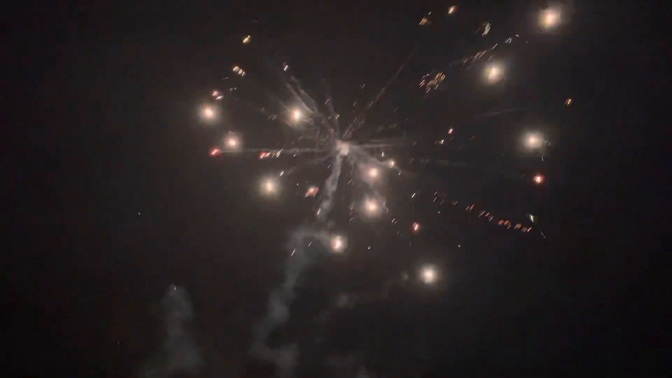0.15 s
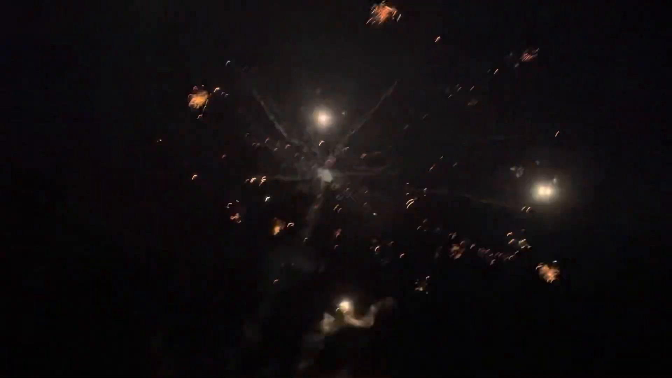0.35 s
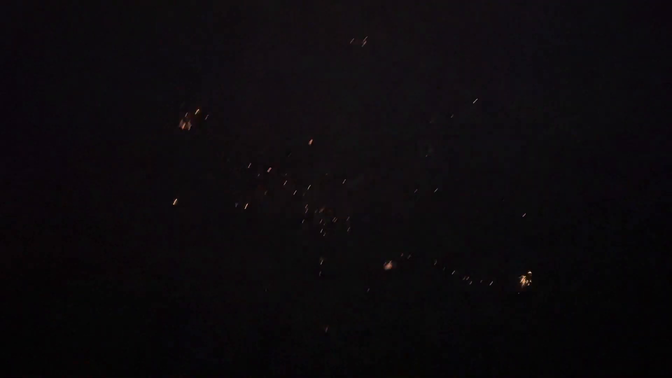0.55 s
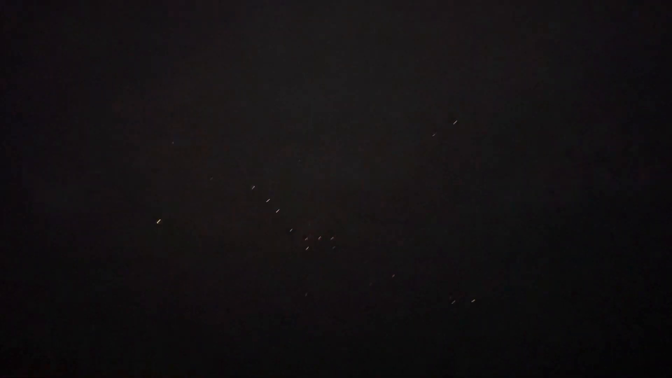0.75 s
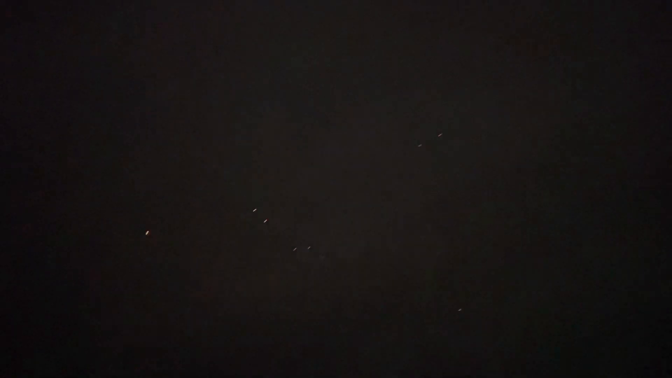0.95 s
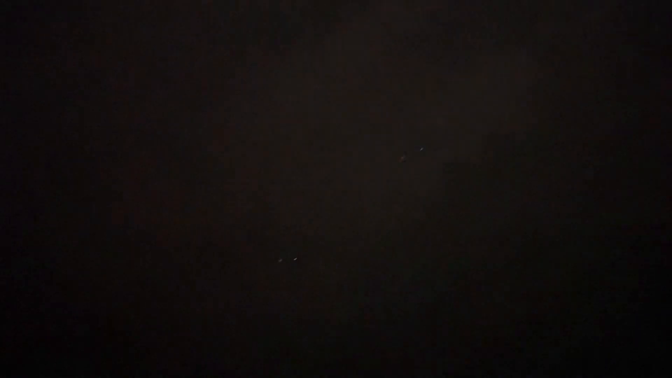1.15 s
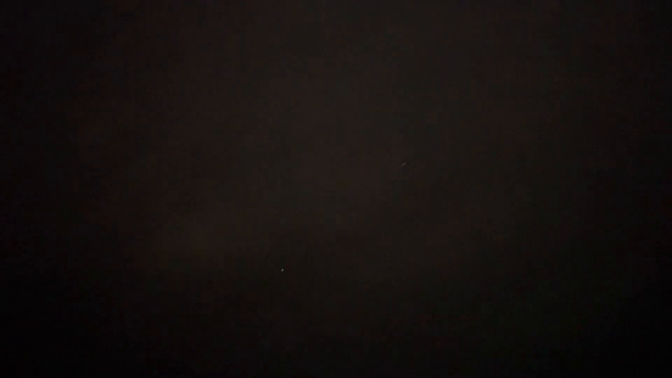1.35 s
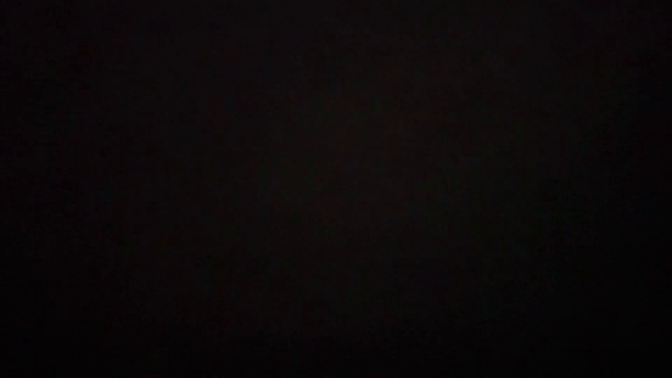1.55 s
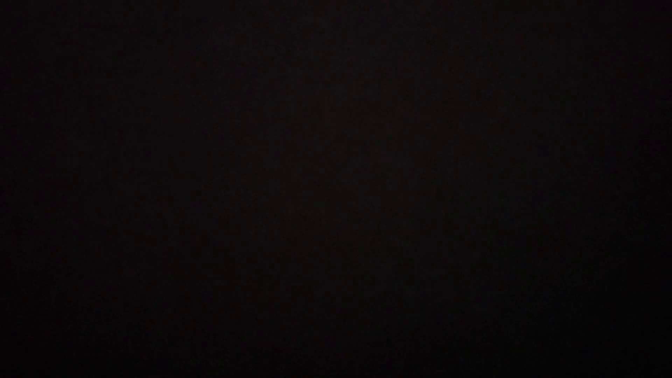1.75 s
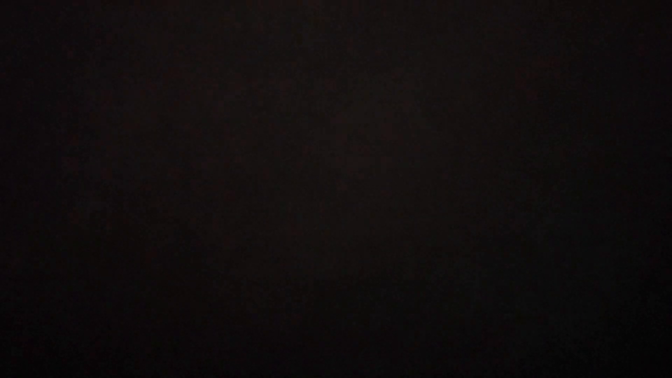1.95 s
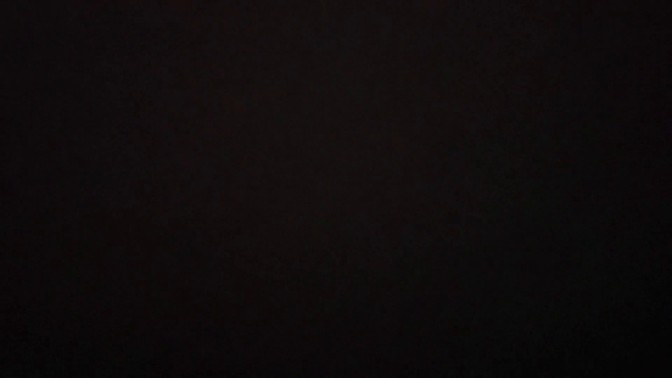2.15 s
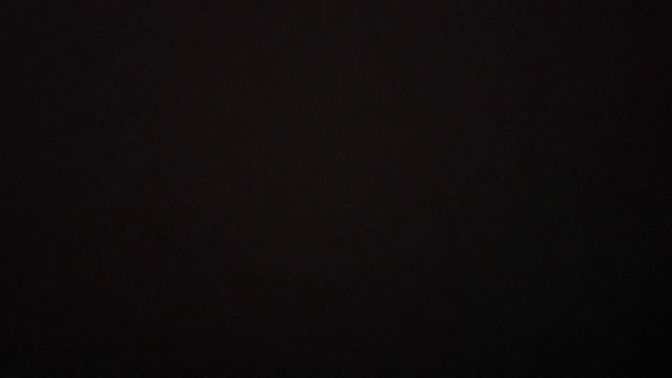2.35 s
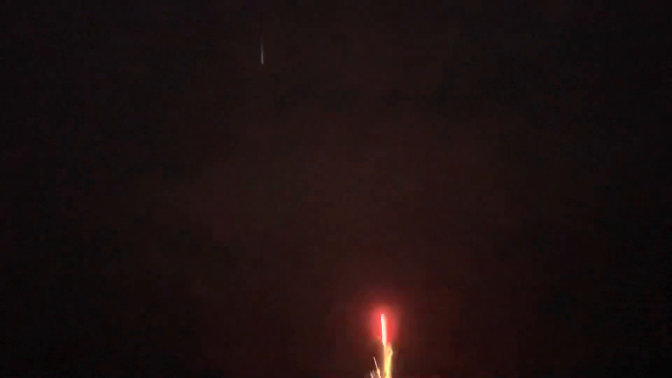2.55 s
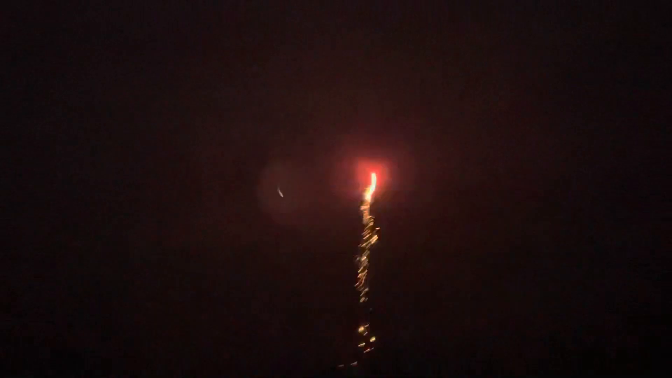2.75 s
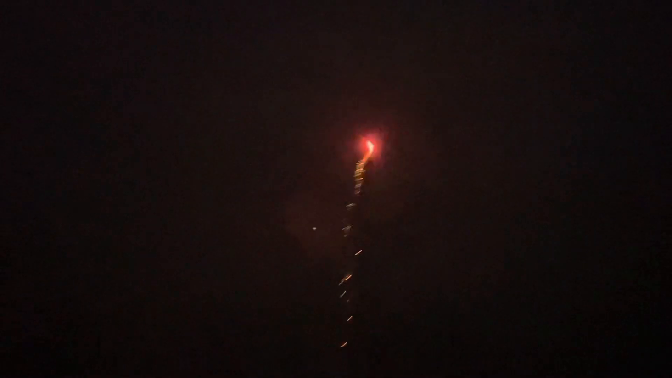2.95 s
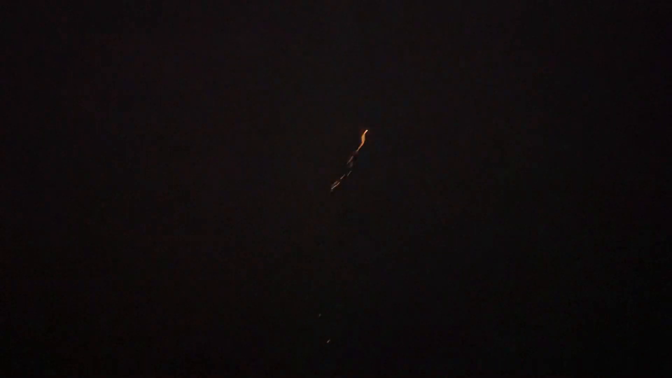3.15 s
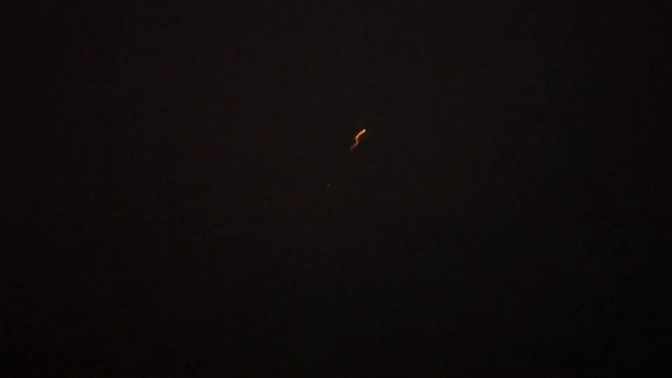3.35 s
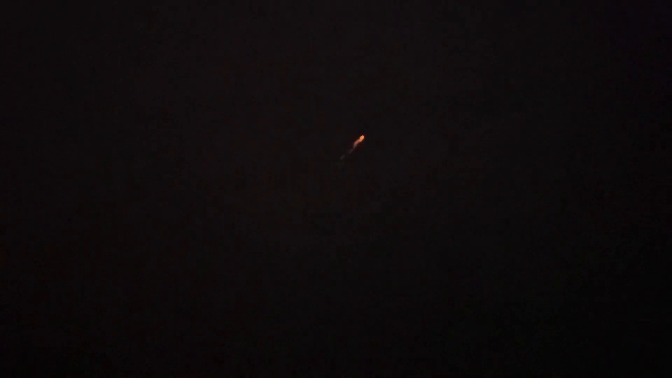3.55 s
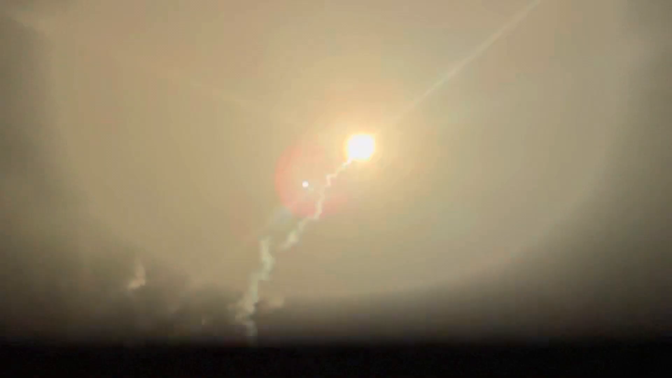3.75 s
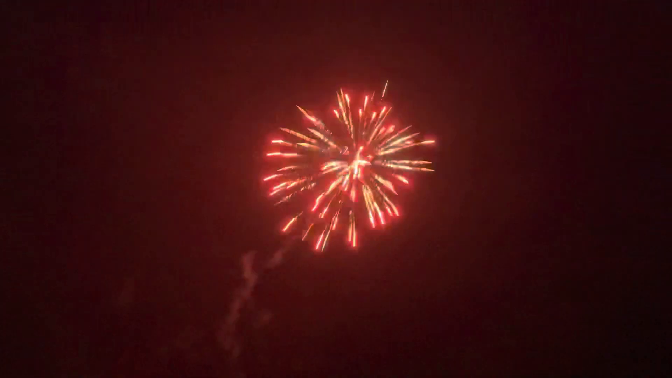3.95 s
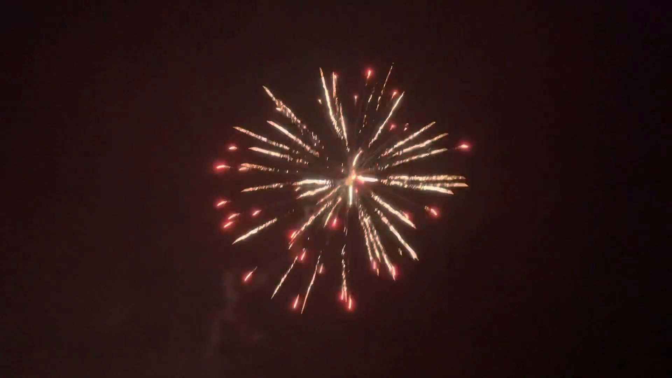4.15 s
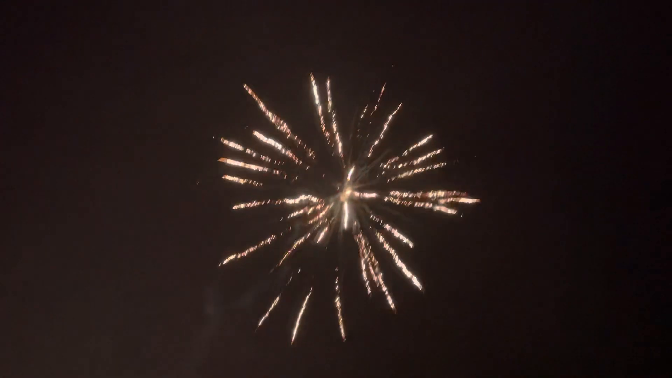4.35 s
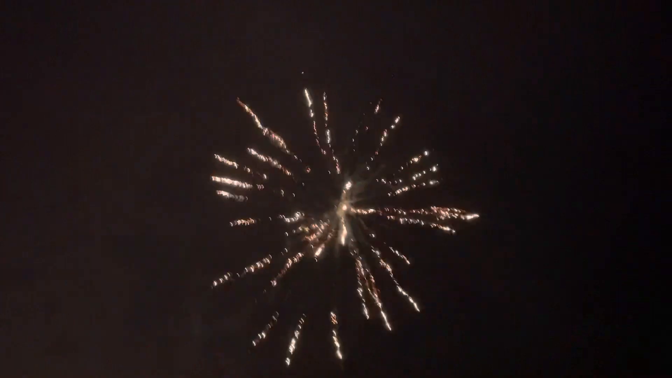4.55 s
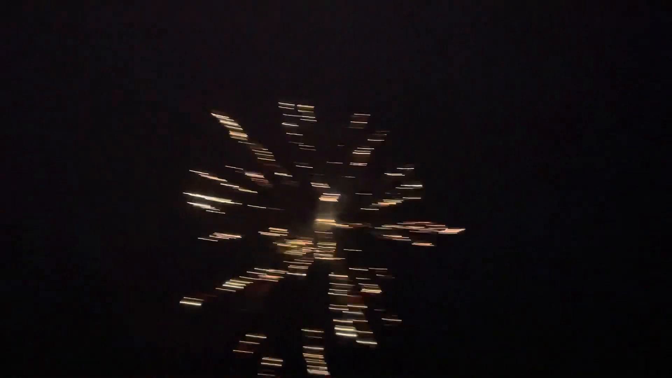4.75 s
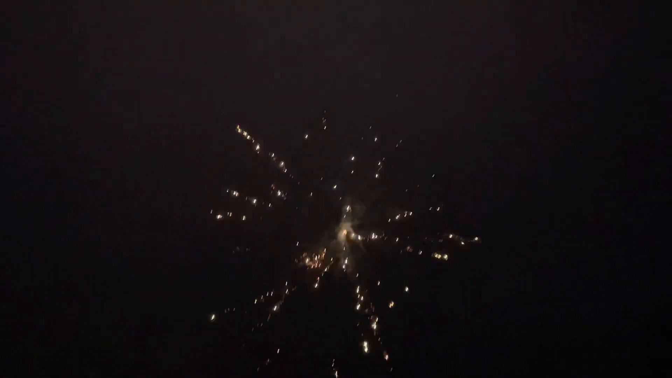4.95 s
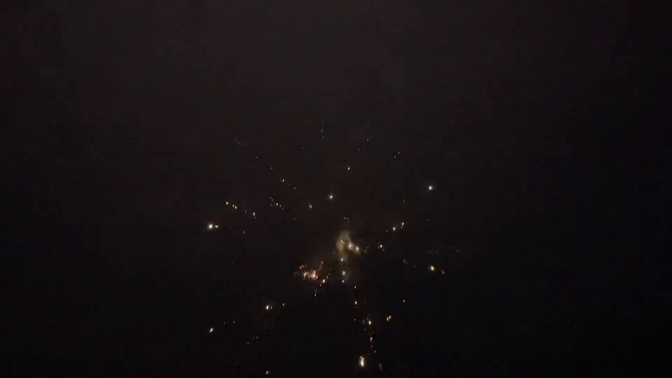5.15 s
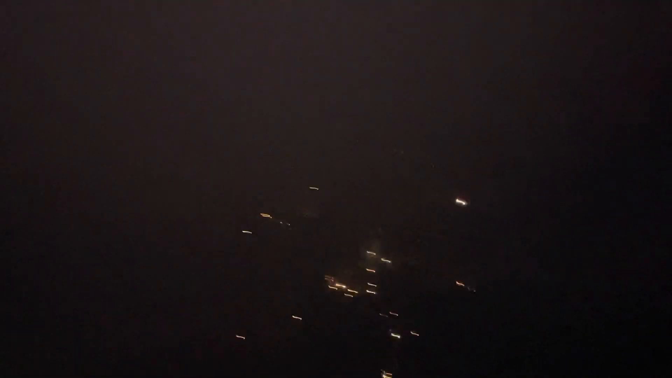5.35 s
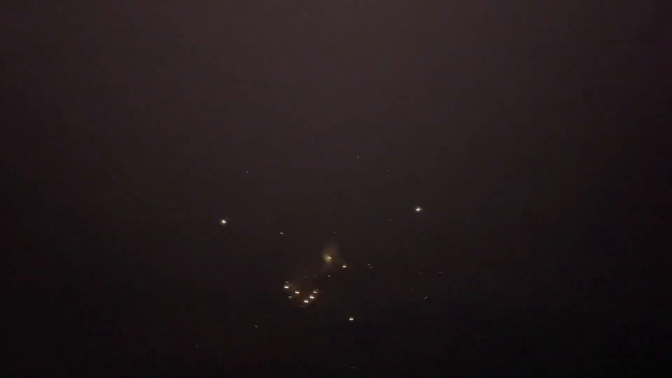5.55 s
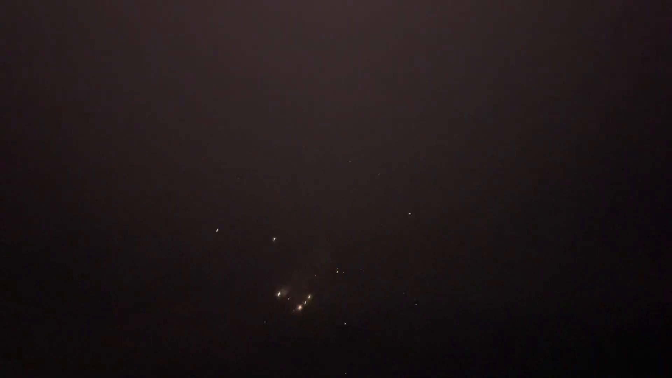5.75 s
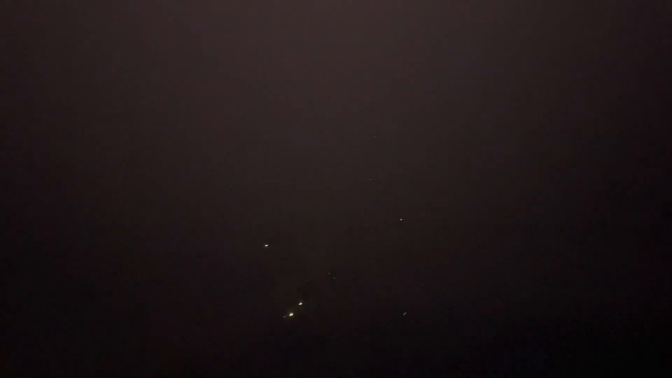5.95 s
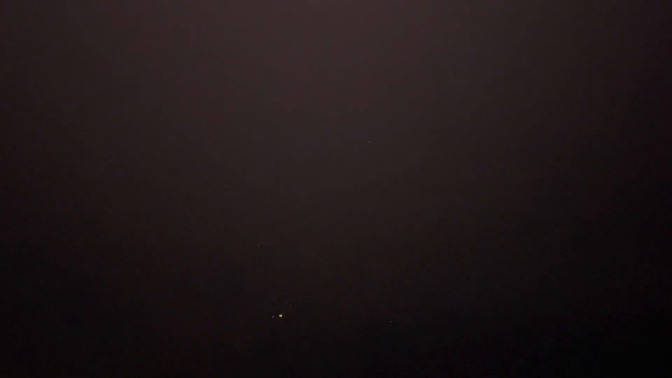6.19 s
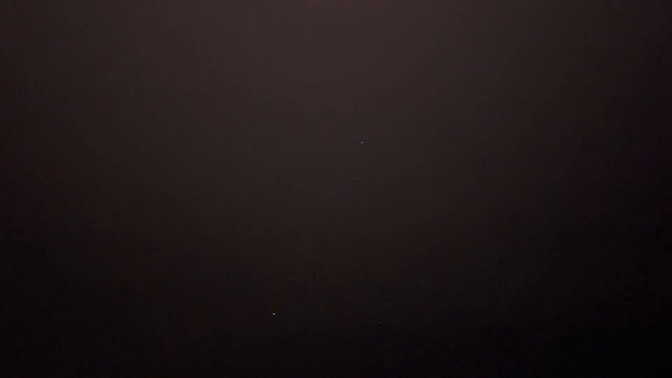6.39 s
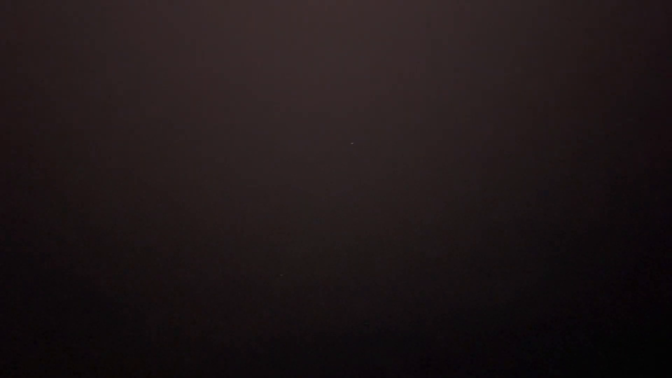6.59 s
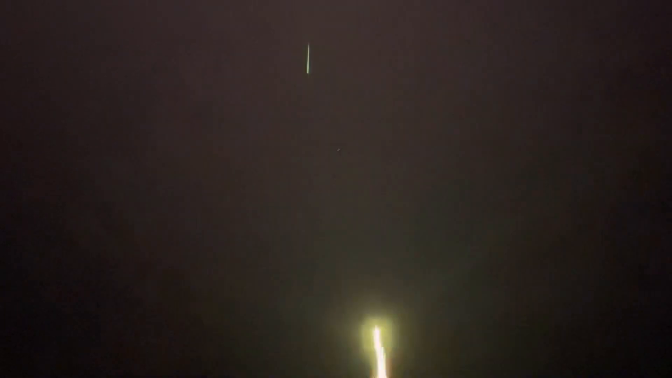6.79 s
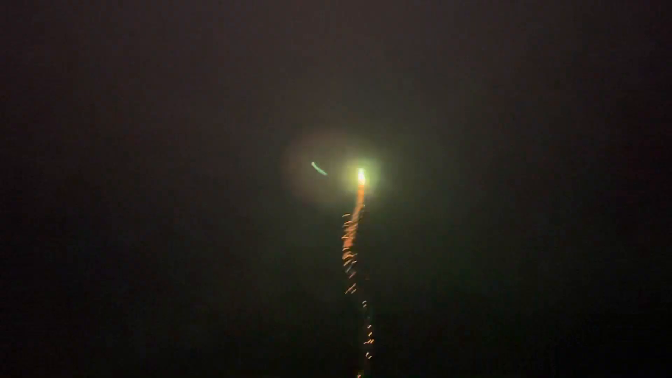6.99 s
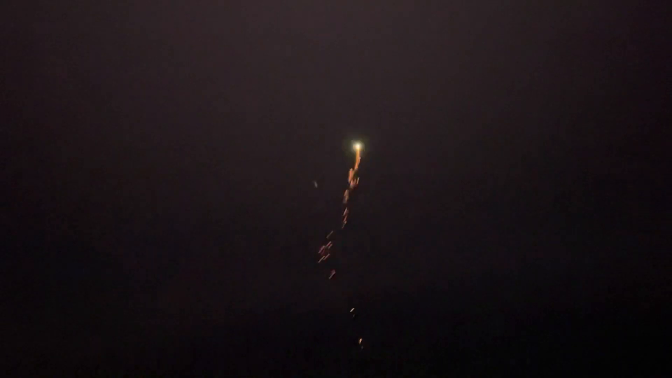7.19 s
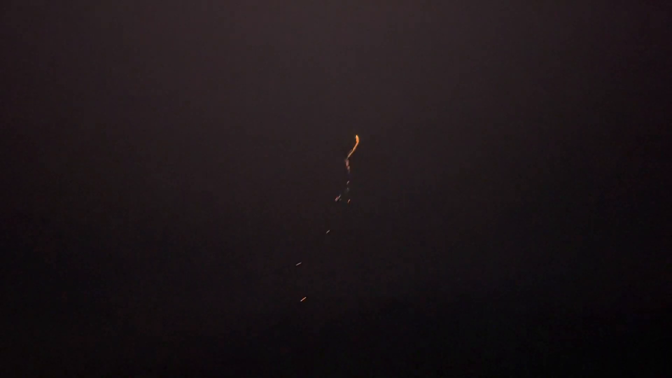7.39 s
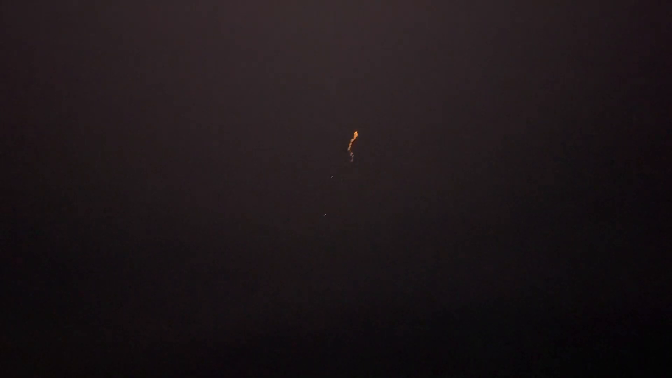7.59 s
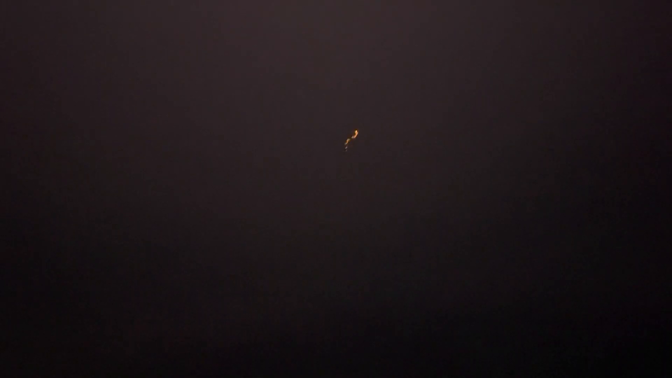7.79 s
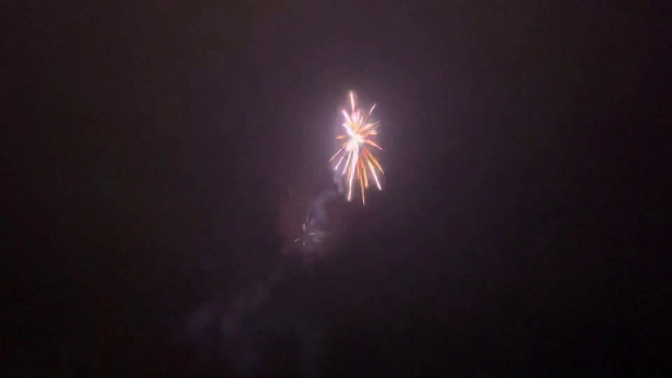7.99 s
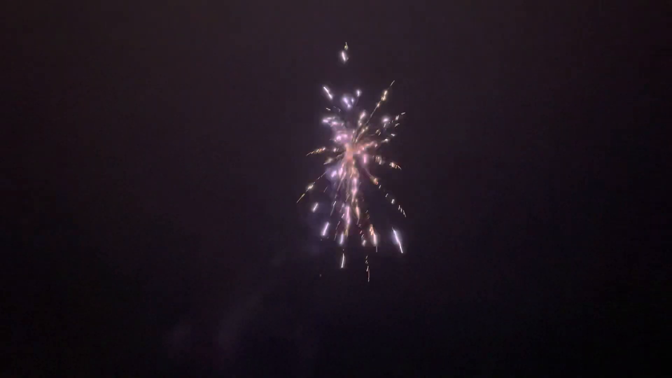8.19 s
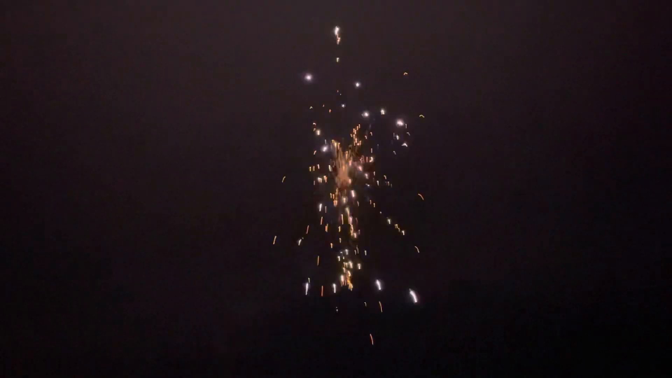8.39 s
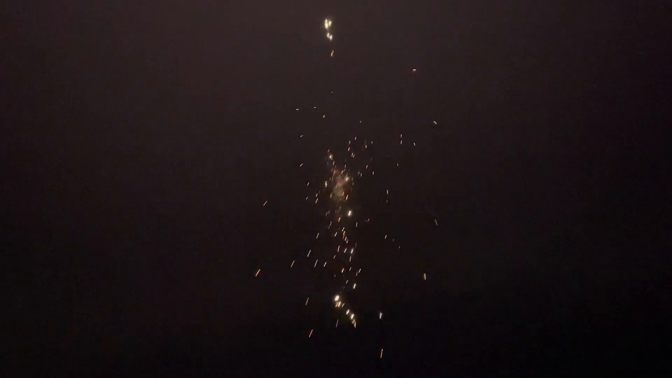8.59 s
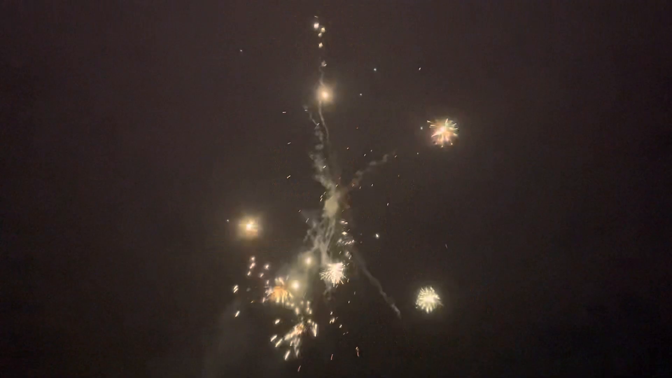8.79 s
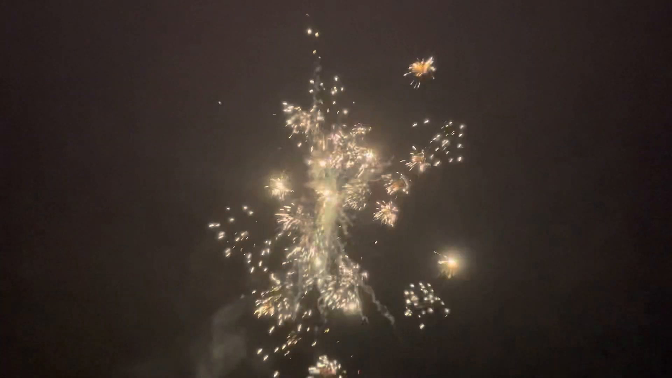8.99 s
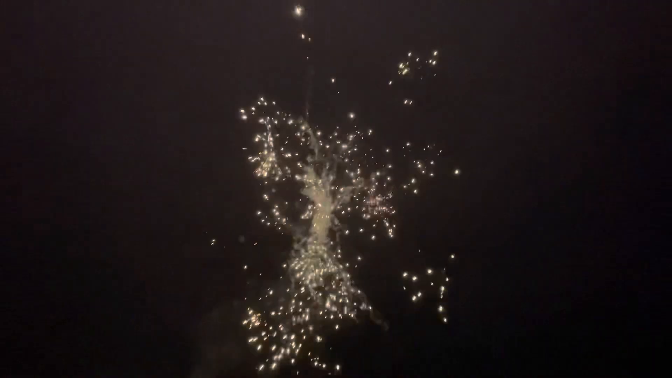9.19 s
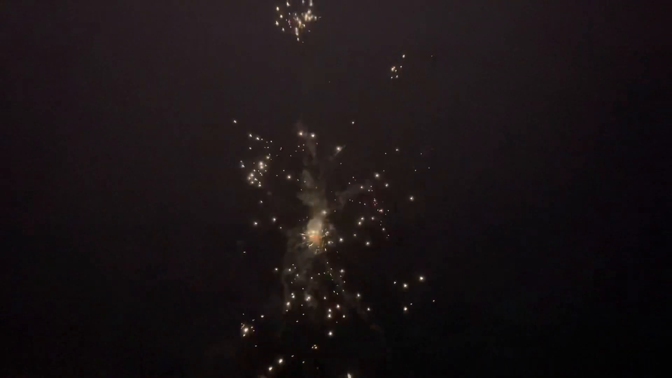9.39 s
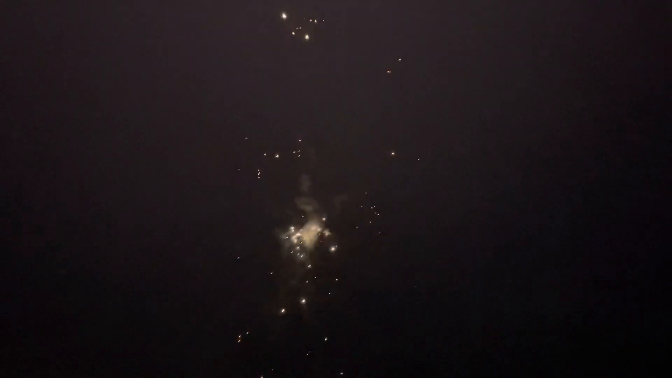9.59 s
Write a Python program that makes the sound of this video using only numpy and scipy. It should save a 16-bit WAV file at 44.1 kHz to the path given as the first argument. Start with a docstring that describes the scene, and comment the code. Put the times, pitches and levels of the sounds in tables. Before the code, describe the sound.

A quiet night outdoors, captured in stereo on a small recorder that softens the loudest peaks. At 0 s the roll of an earlier firework burst is still fading, while stars crackle in a dense spray from about 0.1 to 0.6 s. The roll dulls into a faint low rumble with barely audible ticks. At 2.4 s a launch tube thumps: a sudden, hard, bassy shock with a short hollow note, a quick wall slap and a fading roll. A very faint hiss precedes the sharp burst overhead at 3.9 s, with a duller ground echo and a long rumble losing treble. Near quiet returns by about 6 s. A second launch thuds at 6.7 s, a slight airy hiss rises around 7.5 s, and a deeper burst cracks at 8.05 s. Over its roll, a few pops at 8.7 s grow into thick crackling around 9 s, thinning by 9.5 s into a fading echo.

```python
"""A shell that has just burst is still rolling as its stars crackle; then two more shells go up in the night.
For each, a tube thumps (a muzzle shock in a short burst of noise, and a hollow note), a faint hiss climbs, and
a burst follows about 1.4 s later. Bangs come back from the ground or walls, then roll round the neighbourhood
as fading noise that grows duller. The last burst ends in crackles too: many tiny shocks and spits of gas.
A faint rumble and a few ticks fill the night. A small stereo recorder rounds off the peaks."""
import sys
import numpy as np
from scipy import signal
from scipy.fft import rfft, irfft, next_fast_len
from scipy.io import wavfile

SR = 44100
rng = np.random.default_rng(int(sys.argv[2]) if len(sys.argv) > 2 else 0)


def unload_audio(sound):
    """Save the sound as a 16-bit wav file, at the path given as the first command line argument."""
    columns = np.transpose(np.atleast_2d(sound))
    # keep every value between -1 and 1, then stretch to whole-number steps
    steps = np.round(np.clip(columns, -1, 1) * 32767)
    wavfile.write(sys.argv[1], SR, steps.astype(np.int16))


N = 424666
LEAD = SR // 2  # the scene starts half a second early, so that an earlier burst is still rolling
SIZE = N + LEAD
SHORT = 8192  # samples in the buffer of one bang
HALF_S = SHORT / 2 / SR  # a bang peaks at the middle of its buffer
SECOND = np.arange(SR) / SR  # the time in s along one second


def undb(db):
    """Turn decibels into a gain."""
    return 10 ** (np.asarray(db) / 20)


def along(points, hz):
    """Read a table of (pitch_hz, value) on a log-frequency axis."""
    f, value = np.transpose(points)
    return np.interp(np.log(np.maximum(hz, 1)), np.log(f), value)


def freqs(size):
    """Frequencies of a spectrum of this many samples."""
    return np.fft.rfftfreq(size, 1 / SR)


def unit(x):
    """Scale to a total energy of 1, on average per channel."""
    energy = np.sum(x ** 2, axis=-1)
    return x / np.sqrt(np.mean(energy))


def add(out, s, x):
    """Mix a sound into out at time s, cutting what runs past the end."""
    start = LEAD + int(round(s * SR))
    part = x[..., :max(SIZE - start, 0)]
    out[..., start:start + part.shape[-1]] += part


def pan(db):
    """Gains of left and right for a level difference."""
    return undb(np.array([[db], [-db]]) / 2)


def colour(x, spectrum):
    """Filter by a spectrum of (pitch_hz, level_db)."""
    size = next_fast_len(x.shape[-1])
    gain = undb(along(spectrum, freqs(size)))
    return irfft(rfft(x, size) * gain, size)[..., :x.shape[-1]]


def hump(hz):
    """Spectrum of one broad resonance."""
    return [(hz / 5, -28), (hz / 1.7, -11), (hz, 0), (hz * 1.4, -11), (hz * 5, -30)]


def walk(size, rate):
    """A random wander with a spread near 1, heading for a new value this many times per second."""
    steps = np.arange(size) * rate / SR
    return 1.2 * np.interp(steps, np.arange(4096), rng.standard_normal(4096))


def swell(length_s, power, skew=1):
    """An arch that rises from 0 to 1 and falls back; a skew under 1 brings its top forward."""
    phase = np.clip(SECOND / length_s, 0, 1) ** skew
    return (4 * phase * (1 - phase)) ** power


# how alike left and right are in sound from all around: pitch_hz, correlation (1 = the same)
LIKENESS = [(60, .9), (150, .75), (300, .35), (650, -.1), (1400, -.15), (3100, .25), (4500, .5), (6500, .5),
            (8200, .93)]


def diffuse(size, spectrum):
    """Stereo noise from all around: a shared part and an opposed part, balanced to set the likeness."""
    length = next_fast_len(size)
    hz = freqs(length)
    alike = np.clip(along(LIKENESS, hz), -.98, .98)
    mid, side = rfft(rng.standard_normal((2, length))) * np.sqrt([1 + alike, 1 - alike])
    return irfft(np.array([mid + side, mid - side]) * undb(along(spectrum, hz)), length)[:, :size]


# what the air takes as a roll goes on: pitch_hz, loss_db_per_s
AIR_LOSS = [(100, 1), (400, -1.5), (900, 3.5), (1700, 4.5), (3500, 13), (6000, 23), (10000, 37),
            (16000, 83.5)]


def roll(spectrum, echoes, patchy_db):
    """Countless echoes of one bang; the further they have come, the more treble the air has taken."""
    size = 3 * SR
    hz, s, cells = signal.stft(diffuse(size, spectrum), SR, nperseg=256)
    after_air = cells * undb(-along(AIR_LOSS, hz)[:, None] * s)
    sound = signal.istft(after_air, SR)[1][:, :size]
    fade_db = np.interp(np.arange(size) / SR, *np.transpose(echoes))
    patches_db = patchy_db * (walk(size, 35) + walk(size, 400))
    return unit(sound * undb(fade_db + patches_db))


def shock(spectrum, corner_hz, lag_cycles, size=SHORT):
    """One pressure jump; each pitch lags by lag_cycles of its own cycles, so it drops from crack to thud."""
    hz = np.maximum(freqs(size), 1)
    gain = undb(along(spectrum, hz)) / np.sqrt(1 + (corner_hz / hz) ** 4)  # less bass below the corner
    jump = irfft(gain * np.exp(-2j * np.pi * lag_cycles * np.log(hz / 1000)))
    return np.roll(jump, size // 2) * np.hanning(size)


def spit(spectrum, rise_s, fall_s, size=SHORT):
    """A brief rush of noise with an energy of 1, which grows and dies exponentially."""
    t = (np.arange(size) - size // 2) / SR
    strength = np.exp(np.where(t < 0, t / rise_s, -t / fall_s))
    return unit(diffuse(size, spectrum) * strength)


def bass(thump_db, boom_db, thump_hz=62, thump_s=0.022, boom_hz=48, boom_s=0.165, waver_db=2.5):
    """A low thump that dies at once and a wavering boom that swells after it; each peaks at its own time."""
    thump_swell = (SECOND / thump_s * np.exp(1 - SECOND / thump_s)) ** 1.8
    boom_swell = (SECOND / boom_s * np.exp(1 - SECOND / boom_s)) ** 3.6
    thump = np.sin(2 * np.pi * thump_hz * SECOND) * thump_swell
    boom = np.sin(2 * np.pi * boom_hz * SECOND) * boom_swell
    return undb(thump_db) * thump + undb(boom_db + waver_db * walk(SR, 16)) * boom


# colour of the distant rumble: pitch_hz, level_db
NIGHT = [(15, -37.5), (25, -8), (66, 3.5), (135, -10.5), (309, -5.5), (691, -19), (1500, -19.5),
         (2240, -26), (5140, -36.5), (7280, -31), (8550, -50), (10000, -36), (15000, -58.5)]
NIGHT_DB = -68.5  # loudness of the rumble, around which it wavers
# faint ticks between the shots: peak_s, level_db, pitch_hz
TICKS = [(1.606, -47, 4500), (2.16, -50, 6450), (3.74, -43, 990), (6.293, -40, 1810)]


def night():
    """A faint distant rumble, noise that wavers, and a few ticks, each a tiny spit of noise."""
    rumble = unit(diffuse(SIZE, NIGHT)) * np.sqrt(SIZE)
    out = undb(NIGHT_DB + 1.2 * walk(SIZE, 2.8)) * rumble
    for s, db, hz in TICKS:
        add(out, s - HALF_S, undb(db) * spit(hump(hz), rise_s=0.0004, fall_s=0.0081))
    return out


# hiss of each shell near the top of its climb: start_s, length_s, level_db, pitch_hz, width_hz
CLIMBS = [(3.621, .36, -78, 2262, 171.1), (7.329, 0.58, -65, 1410, 1000)]


def climbs():
    """The burning fuse of each shell hisses faintly: a band of noise that swells and fades."""
    out = np.zeros((2, SIZE))
    for s, length_s, db, hz, width_hz in CLIMBS:
        edge = 1 + width_hz / hz
        below = [(hz / edge ** 3, -50), (hz / edge, -13)]
        above = [(hz * edge, -13), (hz * edge ** 3, -50)]
        hiss = unit(diffuse(SR, below + [(hz, 0)] + above)) * np.sqrt(SR)
        add(out, s, undb(db) * swell(length_s, power=1.5) * hiss)
    return out


# shots from the tube: start_s, level_db, bass_corner_hz, thump_db, boom_db, roll_db,
# left_minus_right_db, lag_cycles, tube_note_hz
LAUNCHES = [(2.4067, 42.5, 38.26, -16, -40.5, 2.5, 3, 1.0, 1985),
            (6.672, 42.5, 104.1, -44, -61.5, 2.5, -0.5, 1.15, 870)]
# colour of the shock before its bass is cut: pitch_hz, level_db
LAUNCH_BLAST = [(30, -2.5), (70, 0.5), (140, -3), (300, -9), (480, -18), (750, -24.5), (1900, -22.5),
                (3000, -36), (7000, -43), (11000, -35.5), (16000, -49.5)]
# what a wall sends back of a launch: pitch_hz, level_db
WALL_KNOCK = [(40, -14), (110, -2.5), (250, -4.5), (600, -17.5), (3000, -26)]
WALL_S, FAR_WALL_S = .0535, .213  # echo delays of the near and the far wall
# colour of the roll before the air dulls it: pitch_hz, level_db
LAUNCH_ROLL = [(30, -6), (70, 8.5), (130, 1.5), (400, 1), (900, -4), (1800, -1), (3200, -4.5), (7500, -9),
               (11000, -11), (16000, -22)]
# how echoes of a bang on the ground fade: delay_s, level_db
LOW_ECHOES = [(.004, -6), (.04, -9), (.09, -3), (.12, 1.5), (.22, -3.5), (.5, -15), (1, -27), (2, -40),
              (3.2, -54)]


def launches(far_wall_db=-28):
    """A muzzle shock in a short burst of noise, a hollow tube note, a wall's slap, a far knock, then the roll."""
    out = np.zeros((2, SIZE))
    for s, db, corner_hz, thump_db, boom_db, roll_db, pan_db, lag, tube_hz in LAUNCHES:
        peak_s = s - HALF_S
        blast = undb(db) * shock(LAUNCH_BLAST, corner_hz, lag) * pan(pan_db)
        noise_burst = undb(db - 40.5) * spit(CRACKLE, rise_s=0.0048, fall_s=0.0025)
        tube_note = undb(db - 31.0) * spit(hump(tube_hz), rise_s=0.0013, fall_s=0.0032)
        add(out, peak_s, blast + noise_burst + tube_note)
        knock = colour(blast, WALL_KNOCK)
        slap = undb(db - 46.5) * spit(LAUNCH_ROLL, rise_s=0.00092, fall_s=.007)
        add(out, peak_s + WALL_S, undb(-30.5) * blast + undb(-20.5) * knock + slap)
        add(out, peak_s + FAR_WALL_S, undb(far_wall_db) * knock)
        add(out, s, bass(thump_db, boom_db))
        add(out, s, undb(roll_db) * roll(LAUNCH_ROLL, LOW_ECHOES, patchy_db=1.24))
    return out


# colour of a popping star, also used for the noise around the bangs: pitch_hz, level_db
CRACKLE = [(30, -52.5), (100, -21.5), (400, -3.5), (900, -3), (1700, 1.5), (3000, -9), (7500, -5.5),
           (11000, -15), (16000, -29)]


def star_colour(treble_db):
    """Spectrum of a popping star, tilted around 3 kHz."""
    return [(hz, db + treble_db * np.clip(np.log2(hz / 3000) / 2, -.5, .5)) for hz, db in CRACKLE]


def pop(treble_db, snap_db=-2.5, gas_db=-1.7, size=1024):
    """One star blows apart: a small shock and a spit of gas."""
    spectrum = star_colour(treble_db)
    snap = unit(shock(spectrum, 150, lag_cycles=.7, size=size))
    gas = spit(spectrum, rise_s=.0005, fall_s=.001, size=size)
    return undb(snap_db) * snap + undb(gas_db) * gas


def shower(spectrum, per_s, strength, spread_db, scatter_db):
    """Stars go off at random as tiny shocks, each with its own size and direction; the energy is 1."""
    sizes = undb(spread_db * np.clip(rng.standard_normal(SR), -2, 2))
    hits = (rng.random(SR) < per_s / SR) * sizes * strength
    hits = hits * undb(scatter_db * rng.standard_normal((2, SR)))  # left and right differ
    tiny_shock = shock(spectrum, 190, lag_cycles=.7, size=1024)
    return unit(signal.fftconvolve(hits, tiny_shock[None], mode="same", axes=1))


# the crackling stars that stand out: peak_s, level_db
POPS = [(0.0659, -2), (0.164, -6), (0.182, -4), (0.1967, -5.5), (0.2046, -5), (0.2548, -2.5),
        (0.2685, -1.5), (0.2715, 0), (0.2788, -0.5), (0.2871, 0), (0.3079, -2.5), (0.3574, -4.5),
        (0.383, -0.5), (0.4023, -4.5), (0.4088, -1.5), (0.4676, -8.5), (0.493, -3), (0.591, -9),
        (0.615, -5), (8.7438, -4), (8.8077, -4), (8.834, -2), (8.904, 4), (8.9235, 6), (8.9533, 0.5),
        (8.9718, 1.5), (9.0011, -1), (9.0402, -0.5), (9.0475, 2.5), (9.061, 0.5), (9.082, 4.5),
        (9.1286, 6.5), (9.1627, 2.5), (9.1858, 1.5), (9.2176, -2), (9.3632, -4.5), (9.4015, -8),
        (9.4552, -2)]
# volleys of crackle: start_s, length_s, small_stars_db, big_stars_db, treble_over_mids_db, left_minus_right_db
# (the last two columns shape the big stars and the pops that stand out)
VOLLEYS = [(.14, .49, 9.5, 1.5, 0.5, -0.5), (8.87, 0.52, 10, 2, -1.5, -0.7)]
SMALL_STARS_PER_S, BIG_STARS_PER_S = 1500, 52  # average rates
# colours of the small stars in each volley: pitch_hz, level_db
FIRST_SHOWER = [(150, -9.5), (450, -0.5), (1000, -6), (2200, 1), (3200, -3.5), (5500, -10), (7500, -3),
                (11000, -13), (16000, -26.5)]
SECOND_SHOWER = [(150, -22), (500, -11), (1000, -11), (1650, -4), (3000, -11.5), (7200, -15), (11000, -24),
                 (16000, -49)]
# what the surroundings send back of the crackle, before the air dulls it: pitch_hz, level_db
CRACKLE_ROLL = [(200, 3), (600, -2.5), (1600, -5.5), (3000, 2), (8000, 0), (16000, 3)]


def crackles(colour_spread_db=2, small_bunching=2.7, big_bunching=0.96, skew=0.66):
    """Stars burn about equally long, so their crackle swells fast and dies; ground and surroundings answer."""
    out = np.zeros((2, SIZE))
    for s, db in POPS:
        *_, treble_db, pan_db = min(VOLLEYS, key=lambda volley: abs(volley[0] - s))  # the nearest volley
        star = pop(treble_db + colour_spread_db * rng.standard_normal())
        add(out, s - star.shape[-1] / 2 / SR, undb(db) * star * pan(pan_db))
    for volley, spectrum in zip(VOLLEYS, (FIRST_SHOWER, SECOND_SHOWER)):
        s, length_s, small_db, big_db, treble_db, pan_db = volley
        small_swell = swell(length_s, small_bunching, skew)
        big_swell = swell(length_s, big_bunching, skew)
        small = shower(spectrum, SMALL_STARS_PER_S, small_swell, spread_db=3.0, scatter_db=5)
        big = shower(star_colour(treble_db), BIG_STARS_PER_S, big_swell, spread_db=1.6, scatter_db=2.5)
        add(out, s, undb(small_db) * small + undb(big_db) * big * pan(pan_db))
    ground = undb(-9) * colour(np.roll(out, int(0.01 * SR), axis=1), GROUND_ECHO)
    around = roll(CRACKLE_ROLL, HIGH_ECHOES, patchy_db=1)
    answer = signal.fftconvolve(out[:1], around, axes=1)[:, :SIZE]  # fed by the left channel
    return out + ground + undb(-16.0) * answer


# shells bursting overhead: start_s, level_db, bass_corner_hz, thump_db, boom_db, roll_db, left_minus_right_db
BURSTS = [(-.25, 40, 81, -30.5, -41, 11.5, 0), (3.9175, 38.5, 82.2, -43.5, -47, 11.5, -1),
          (8.0454, 39, 39.9, -16.5, -29, 12.5, 3)]
# colour of the shock before its bass is cut: pitch_hz, level_db
BURST_BLAST = [(30, -4), (70, 1), (240, 0), (480, -5.5), (1000, -20.5), (1800, -19), (2800, -34),
               (5000, -36), (9000, -40.5), (16000, -46)]
# what the ground sends back, of the crackle too: pitch_hz, level_db
GROUND_ECHO = [(100, -24), (300, 1.5), (700, -0.5), (1700, 3.5), (2800, -19.5), (6000, -25.5), (16000, -43)]
# colour of the roll before the air dulls it: pitch_hz, level_db
BURST_ROLL = [(30, -21.5), (100, -10), (200, -5), (370, 3), (700, 0.5), (1050, -7), (1700, -3.5),
              (3000, -10.5), (5500, -15), (8000, -13), (11000, -19.5), (16000, -31.5)]
# how echoes of a sound high up fade, of the crackle too: delay_s, level_db
HIGH_ECHOES = [(.004, -4), (.05, -1), (.12, -5.5), (0.231, 2), (.32, -1.5), (0.499, -5.5), (1, -15),
               (1.5, -22.5), (2.5, -31.5), (3.201, -41.5)]


def bursts(ground_s=.0118, rush_hz=1550):
    """A shock high up, a brief mid-pitched rush of noise around it, a duller twin off the ground, a long roll."""
    out = np.zeros((2, SIZE))
    for s, db, corner_hz, thump_db, boom_db, roll_db, pan_db in BURSTS:
        peak_s = s - HALF_S
        blast = undb(db) * shock(BURST_BLAST, corner_hz, lag_cycles=.85) * pan(pan_db)
        noise_burst = undb(db - 37.5) * spit(CRACKLE, rise_s=0.00032, fall_s=0.00072)
        rush = undb(db - 32.0) * spit(hump(rush_hz), rise_s=.003, fall_s=0.00068)
        add(out, peak_s, blast + noise_burst + rush)
        twin = undb(db - 18.5) * shock(GROUND_ECHO, corner_hz, lag_cycles=0.87)
        twin_noise = undb(db - 30) * spit(GROUND_ECHO, rise_s=0.0018, fall_s=0.0038)
        add(out, peak_s + ground_s, twin + twin_noise)
        add(out, s, bass(thump_db, boom_db))
        add(out, s, undb(roll_db) * roll(BURST_ROLL, HIGH_ECHOES, patchy_db=0.56))
    return out


def scene():
    """The quiet night, climbing shells, launches, crackles and bursts together, without the early lead."""
    return (night() + climbs() + launches() + crackles() + bursts())[:, LEAD:]


# between the two microphone ports: pitch_hz, left_lead_radians
PORT_PHASE = [(20, -.25), (400, -.2), (1250, -.7), (2100, 1), (3000, 0), (4600, -.2), (5800, 2),
              (7200, 1.2), (8500, 3.1), (10300, 5.7), (12800, 9.4), (16000, 13.2)]
# between the two microphone ports: pitch_hz, left_minus_right_db
PORT_BALANCE = [(60, -1), (110, 0.5), (200, 0.3), (380, 0.4), (700, 0), (1290, -2), (2380, 1), (4400, 1),
                (8120, -1.5), (15000, 1)]
CEILING, TOP_HZ = .86, 16000  # the level that peaks bend towards (full scale = 1), and the treble limit


def record(dry):
    """The two ports differ in phase and colour; the bangs are rounded off and the top is cut."""
    size = next_fast_len(N + SHORT)
    hz, sides = freqs(size), np.array([[.5], [-.5]])
    ports = undb(sides * along(PORT_BALANCE, hz)) * np.exp(1j * sides * along(PORT_PHASE, hz))
    sound = irfft(rfft(dry, size) * ports, size)[:, :N]
    rounded = sound / (1 + (sound / CEILING) ** 4) ** (1 / 4)
    top_cut = signal.ellip(8, .2, 70, TOP_HZ, fs=SR, output="sos")
    return signal.sosfilt(top_cut, rounded)


dry = scene()
out = record(dry)
unload_audio(out)
```